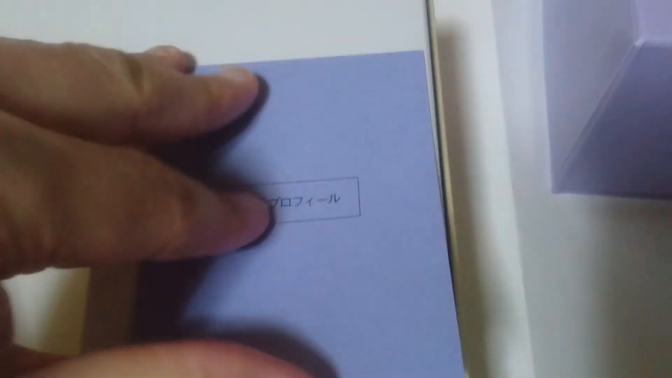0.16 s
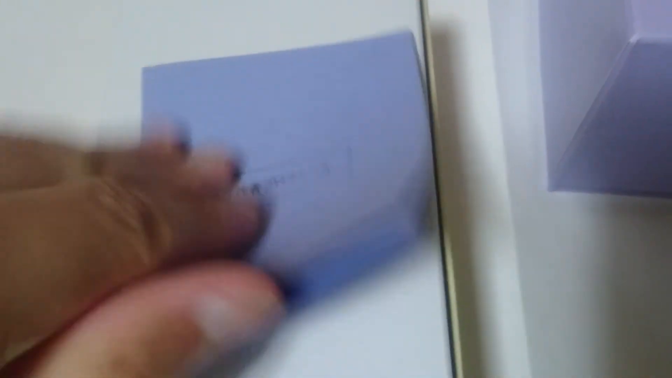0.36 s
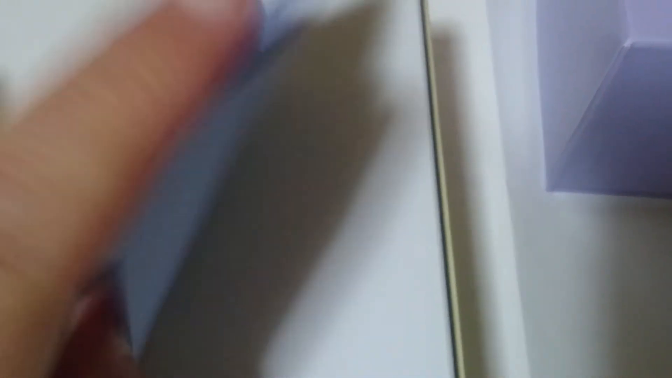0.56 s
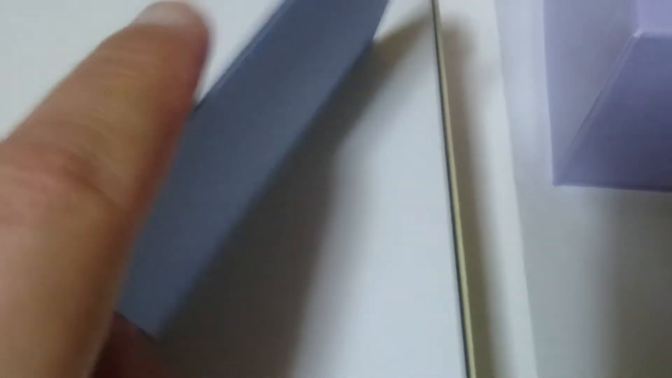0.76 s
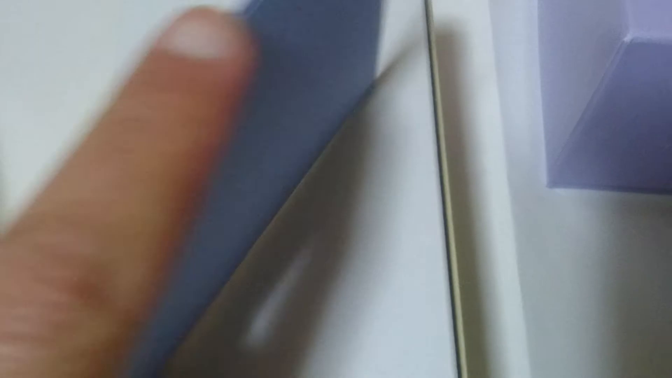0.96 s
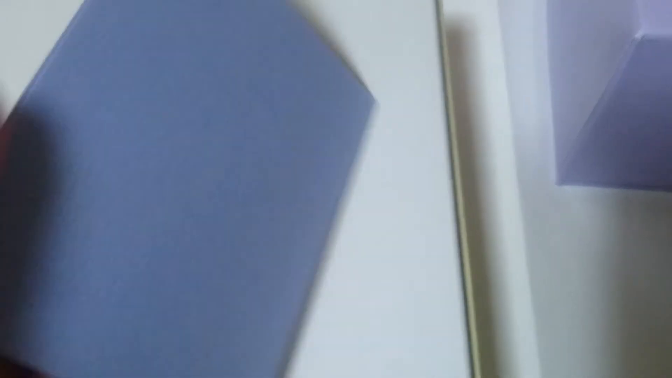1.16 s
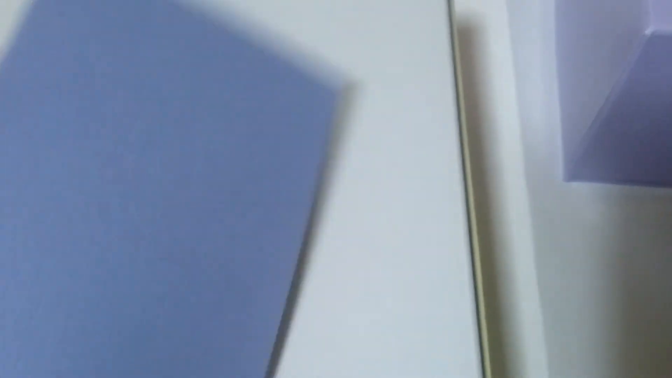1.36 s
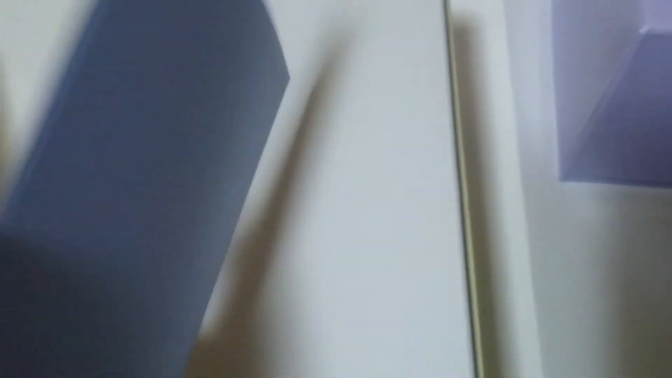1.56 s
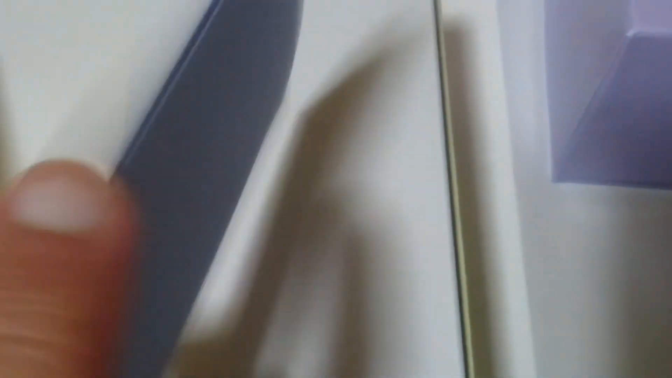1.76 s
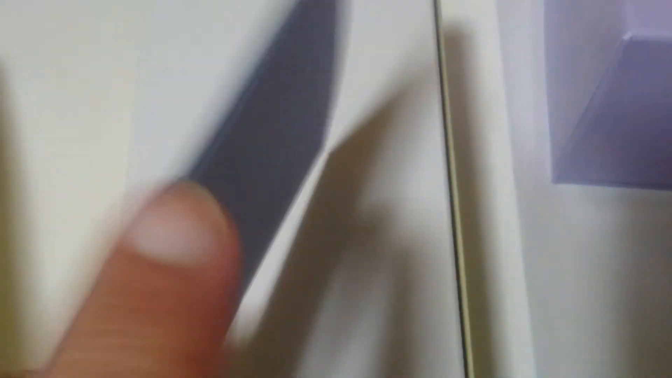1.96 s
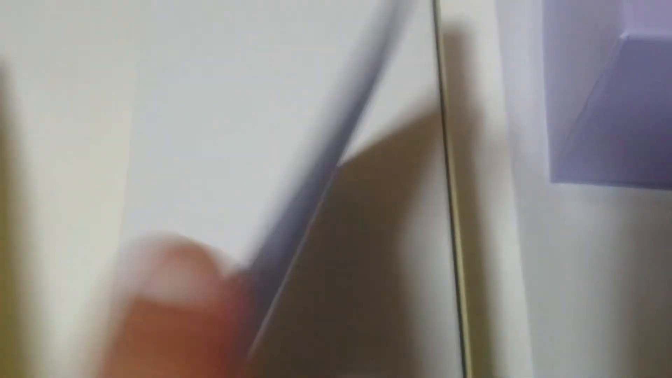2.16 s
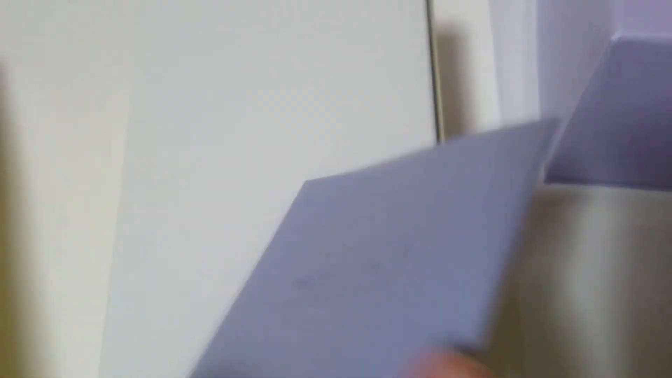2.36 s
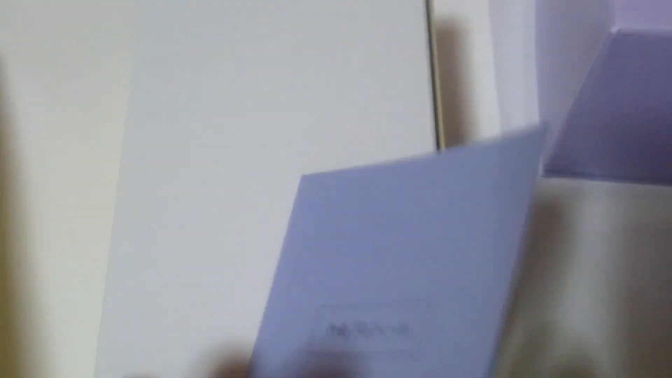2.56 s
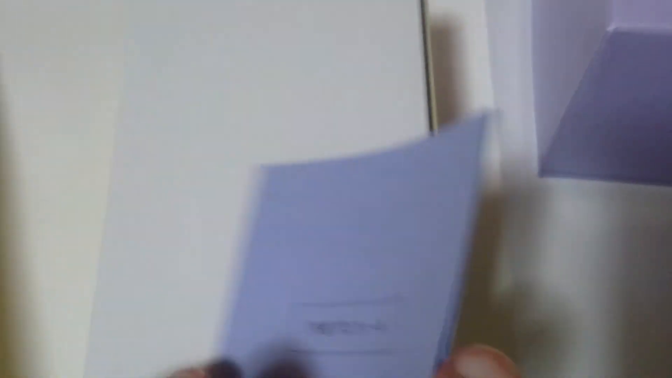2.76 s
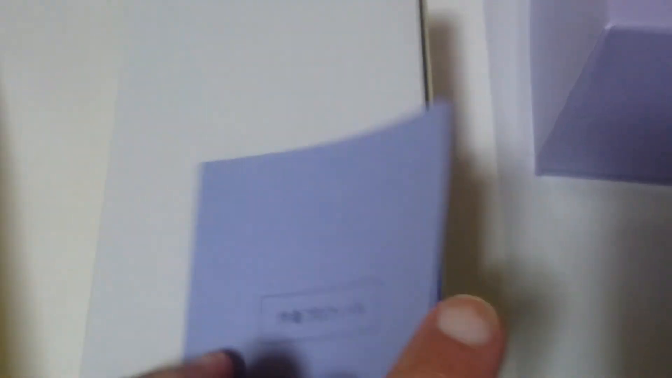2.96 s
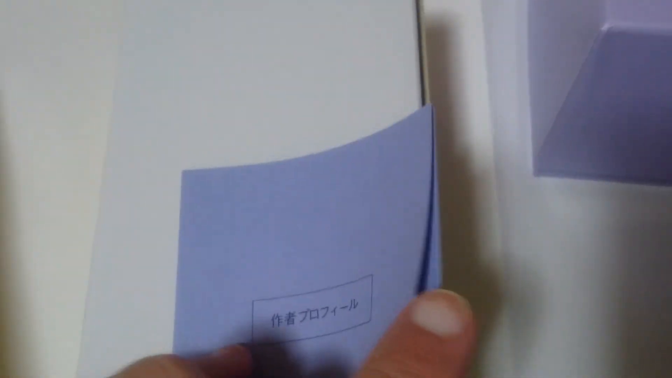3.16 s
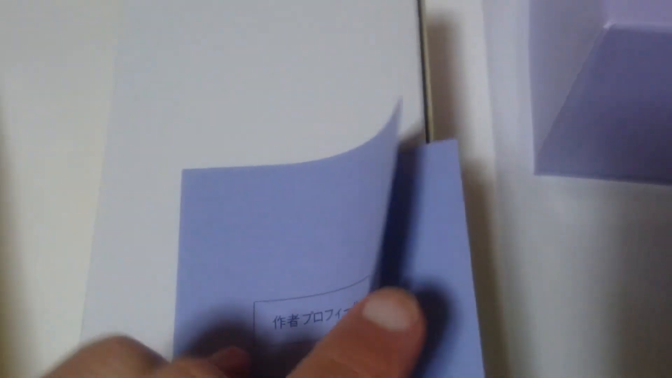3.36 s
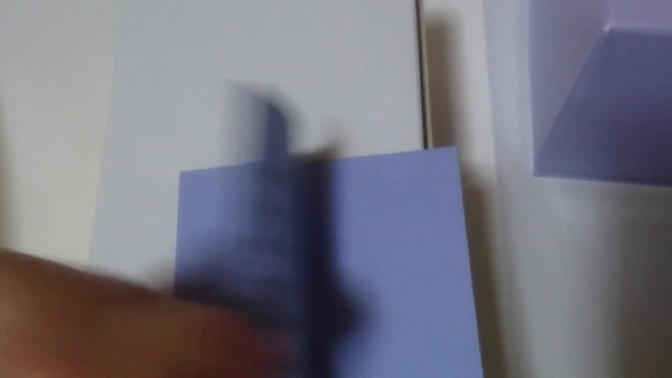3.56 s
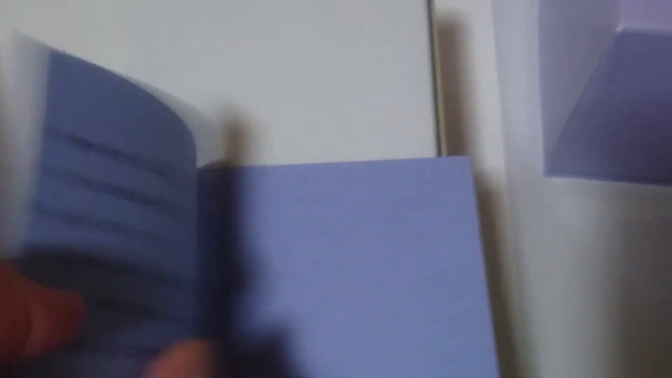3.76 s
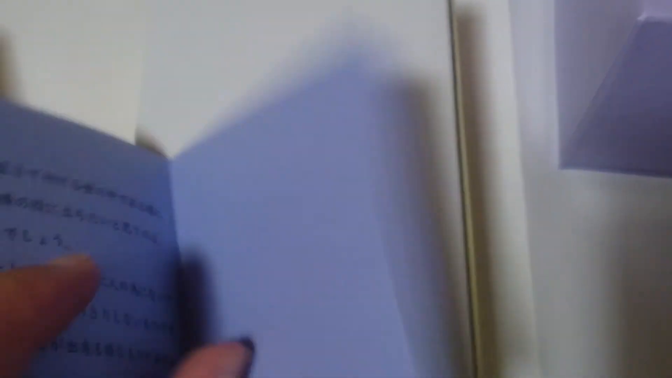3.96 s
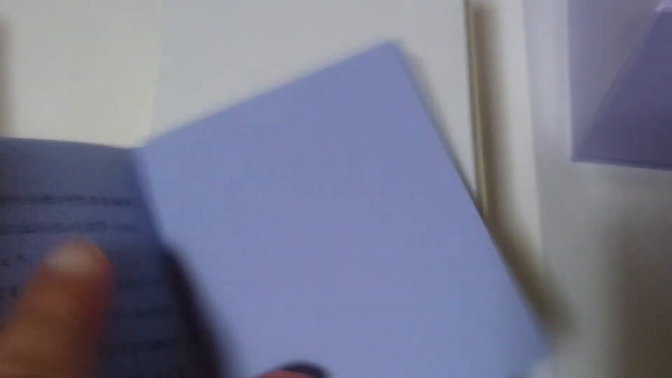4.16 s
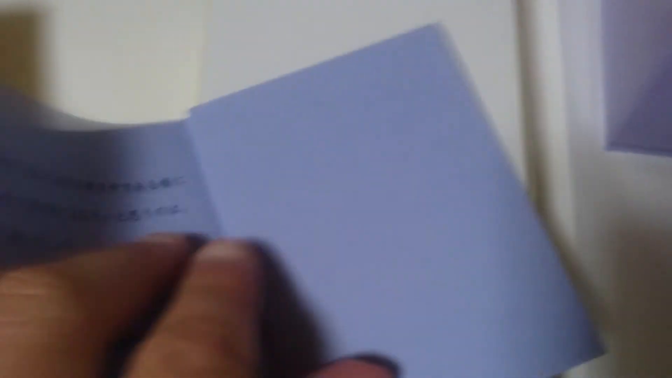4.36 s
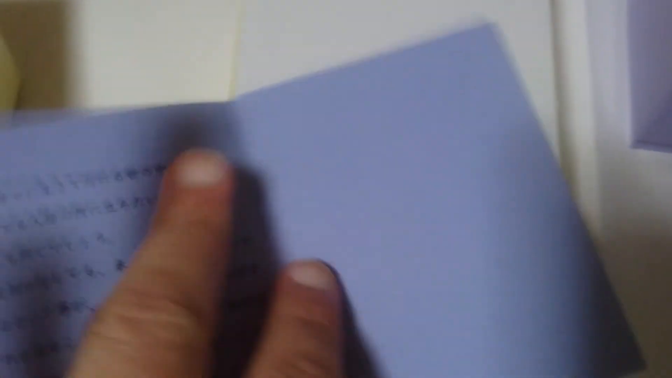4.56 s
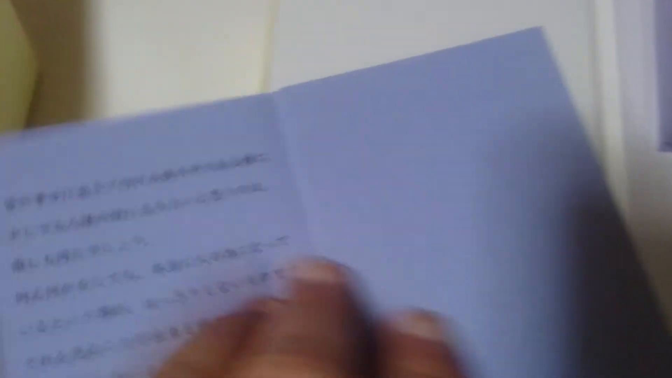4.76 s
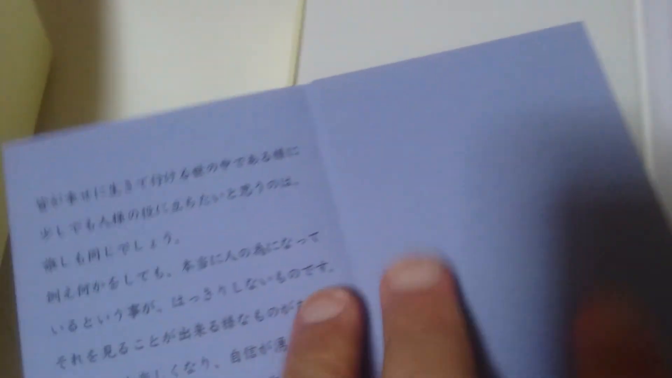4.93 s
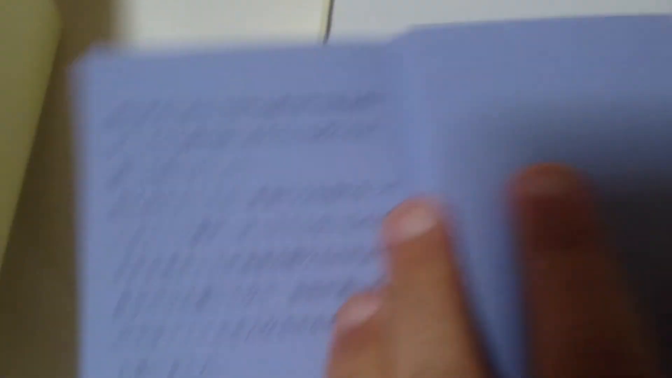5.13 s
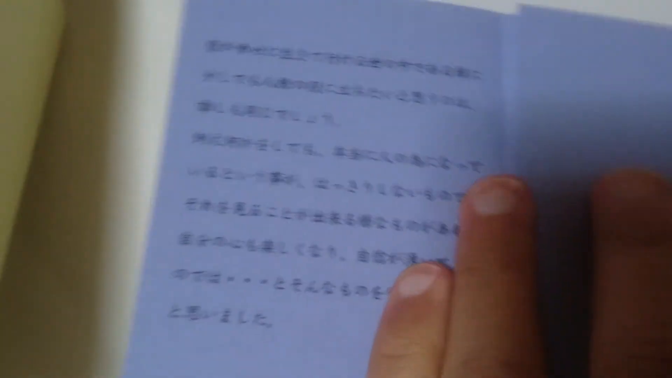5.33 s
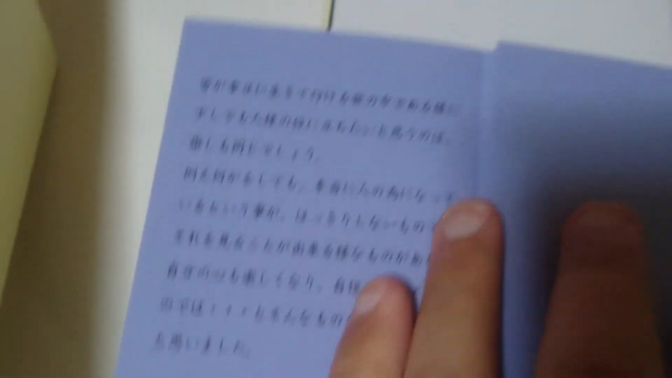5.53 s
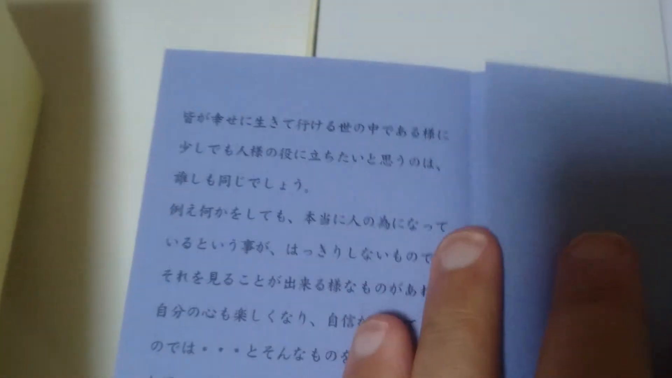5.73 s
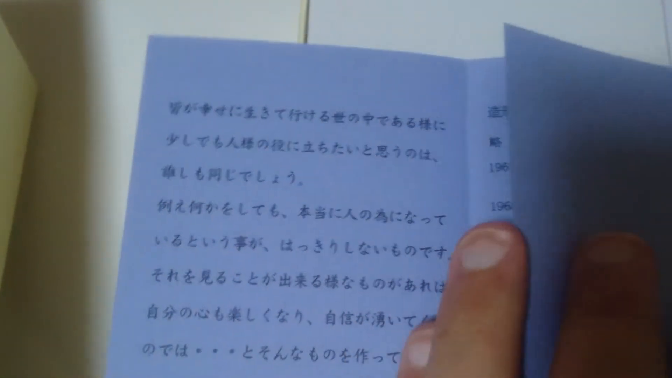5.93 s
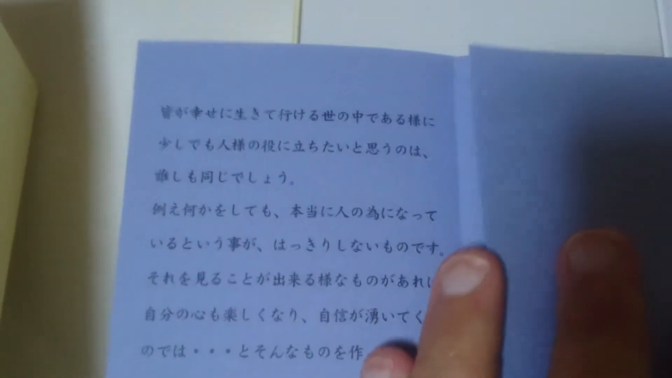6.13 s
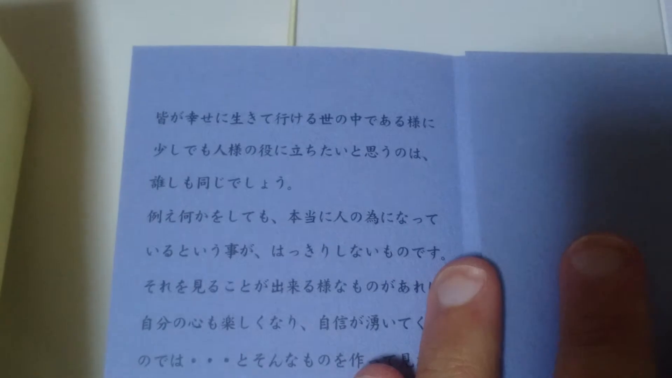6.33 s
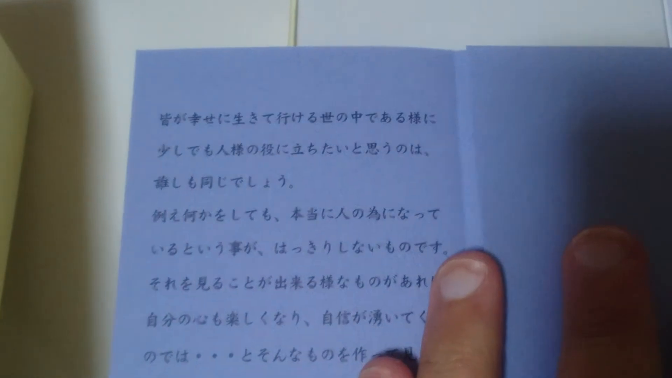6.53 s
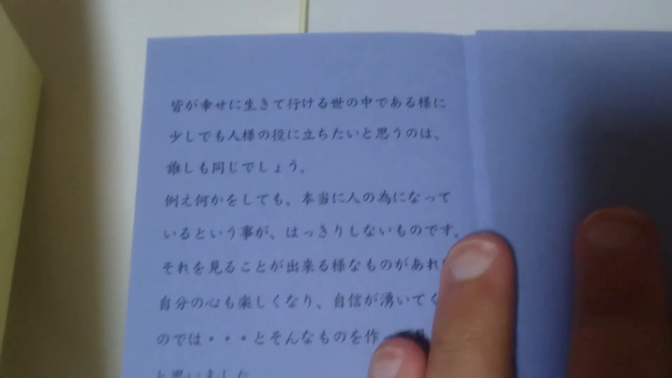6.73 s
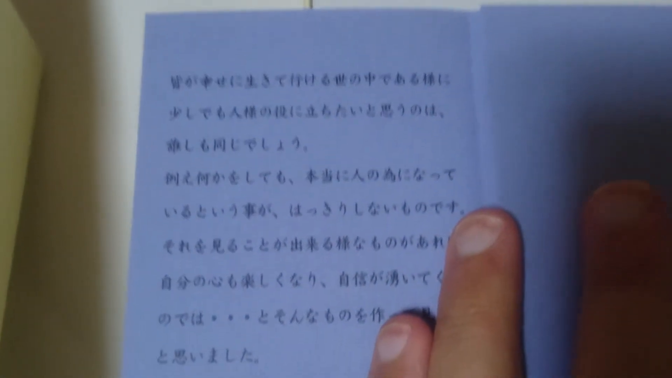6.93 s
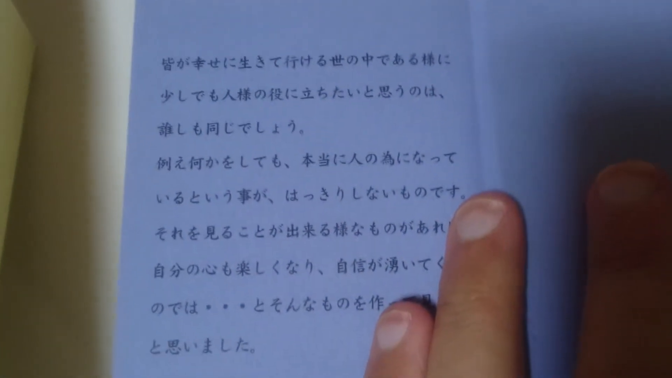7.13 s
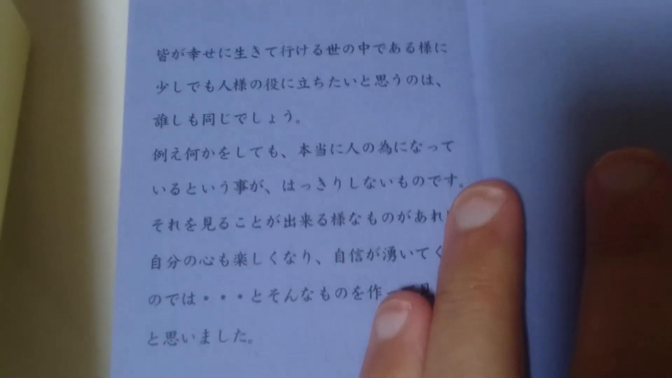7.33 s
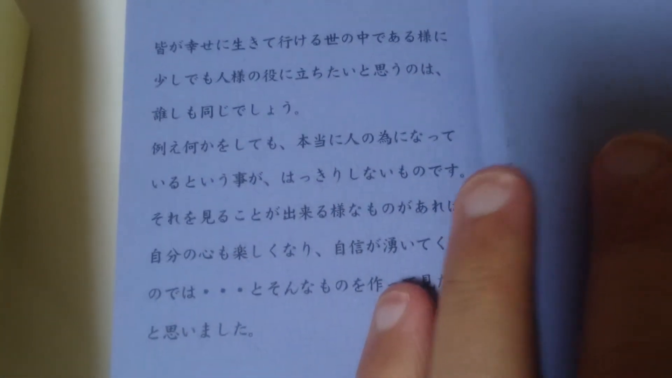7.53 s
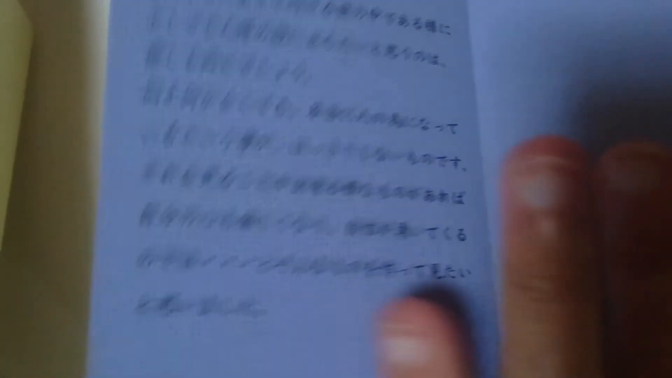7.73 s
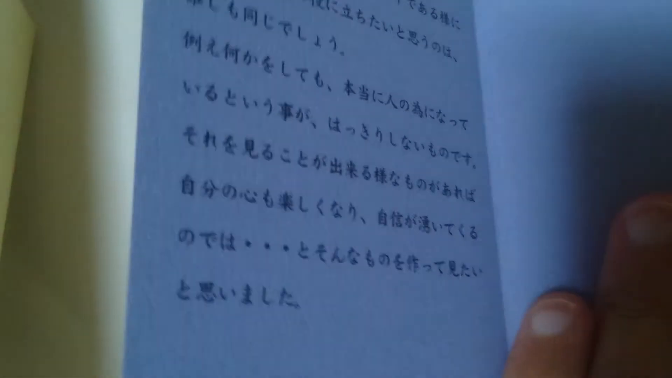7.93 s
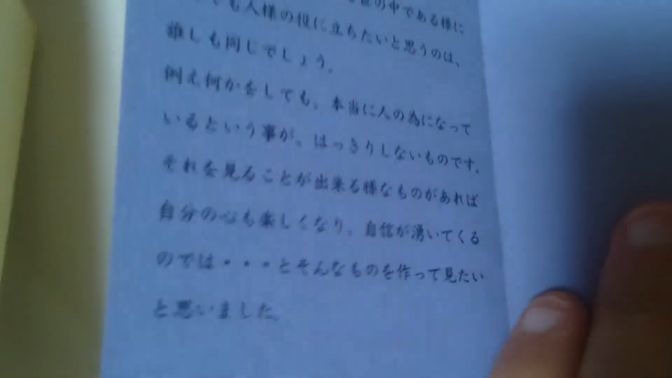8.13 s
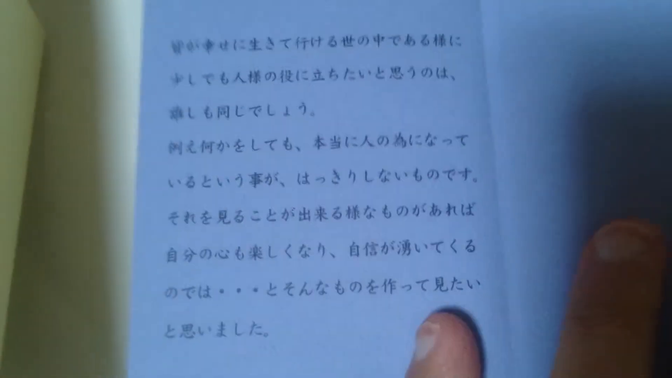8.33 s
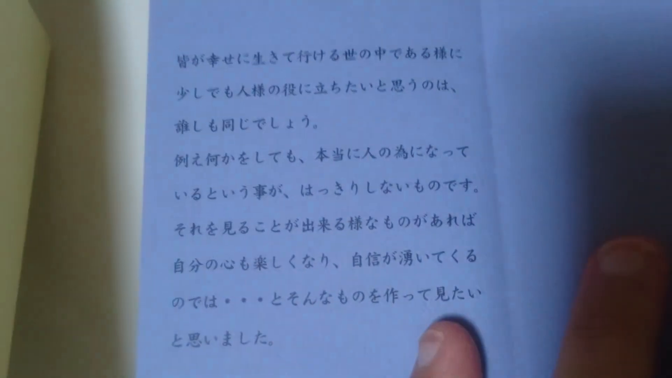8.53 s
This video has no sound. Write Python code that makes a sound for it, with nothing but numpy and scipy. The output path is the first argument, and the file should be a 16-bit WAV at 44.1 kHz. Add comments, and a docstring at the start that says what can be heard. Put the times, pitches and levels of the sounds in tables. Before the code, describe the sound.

Close, dry paper sounds in a small, quiet room. A booklet's cover brushes past the fingers and buckles crisply twice, followed by gentle sliding and scattered ticks. Midway the pages flap open with a cluster of snaps, and fingertips thump softly on the desk and rub along the fold. The rubbing fades almost to silence before a last brief rustle and a couple of clicks from a turning page.

```python
"""At a desk in a quiet room, a small paper booklet is handled close by.
The cover is lifted, the booklet is opened and pressed flat, and a page is turned. Sliding sheets
hiss and tick as their fibres catch, stiff paper buckles with snaps, and edges swish past the fingers.
Air rings between the rubbing sheets; fingertips thud softly and squeak once along the fold.
The desk ripples the colour of the rubbing, and a short room tail and faint room tone sit behind it."""
import sys
import numpy as np
from scipy import signal
from scipy.fft import rfft, irfft, next_fast_len
from scipy.io import wavfile
from scipy.ndimage import map_coordinates

SR = 44100
rng = np.random.default_rng(int(sys.argv[2]) if len(sys.argv) > 2 else 0)


def unload_wav(signal):
    """Save mono or channel-first audio to the path in sys.argv[1] as 16-bit WAV at rate SR, clipped to [-1, 1]."""
    wavfile.write(
        sys.argv[1],
        SR,
        np.round(np.clip(np.atleast_2d(signal).T, -1, 1) * 32767).astype(np.int16),
    )


N = 378819

# a hand slides paper over paper; swell is the change over the stroke, body and fizz are re the rustle:
# start_s, end_s, rustle_db, swell_db, body_db, fizz_db, centre_hz
STROKES = [(0, 0.241, -64, 4, -6.5, -20.5, 1500), (.25, 0.448, -56.5, 3.5, -10, -16.5, 3200),
           (0.479, 0.652, -53, 7.5, -9.5, -8, 2000), (.72, .94, -61, -9.5, -2.5, -22.5, 1600),
           (.96, 1.04, -67.5, 14.5, -1.5, -21, 2004), (1.05, 1.237, -60, 0.5, -3, -26.5, 1700),
           (1.27, 1.45, -64, 8, -6, -20.5, 2910), (1.505, 1.645, -67, -3, -1, -18, 2009),
           (1.66, 1.848, -66.5, 1, -9, -29, 1400), (1.86, 2.18, -76.5, -4.5, -6.5, -30, 1400),
           (2.288, 2.54, -65.5, -1.5, 0, -21.5, 1700), (2.542, 2.861, -56, 2, -5.5, -22, 1500),
           (2.884, 3.222, -67, 0, -5.5, -18, 2100), (3.26, 3.335, -66, 3, -7, -20, 1800),
           (3.345, 3.62, -61, -7, -10.5, -24, 1900), (3.63, 3.846, -50.5, 10, -18, -24.5, 2300),
           (3.863, 3.953, -52.5, 7, -4.5, -17, 1816), (3.97, 4.26, -52.5, 3.5, -7, -15.5, 2200),
           (4.27, 4.454, -52.5, 10.5, -8, -23, 1400), (4.473, 4.604, -44, -2.5, -10.5, -18, 1600),
           (4.632, 4.743, -60, -2, 4, -8, 1900), (4.745, 4.929, -53, 0, -2.5, -5.5, 1950),
           (4.934, 5.116, -59, 6.5, -8, -12, 2700), (5.121, 5.248, -45, -1, -12.5, -12, 3210),
           (5.258, 5.332, -54, -6.5, -10, -20.5, 3385), (5.359, 5.468, -55, -0.5, -8, -26, 3200),
           (5.478, 5.856, -63.5, -7.5, -4.5, -32.5, 1500), (5.846, 5.932, -59, 2.5, -9.5, -19.5, 3000),
           (5.93, 6.137, -64.5, 2.5, -8, -23.5, 2600), (6.14, 6.353, -71.5, 1, -5, -19.5, 2367),
           (6.36, 7.664, -87, 0, -5.5, -6.5, 4486), (7.674, 7.814, -67.5, -2.5, -2, -24, 1500),
           (7.809, 7.914, -58.5, 6, -8.5, -9, 2400), (7.938, 8.022, -66.5, -7.5, 0.5, -24, 1500),
           (8.06, 8.122, -62.5, 0.5, 0.5, -16, 1500), (8.16, 8.367, -70, 3.5, 1.5, -20, 1500),
           (8.38, 8.52, -77, -8.5, -1.5, -19, 1498)]
# a sheet buckles suddenly: start_s, level_db (over 10 ms), pitch_hz, high_edge_hz, pop_share (0-1)
SNAPS = [(.589, -44, 1400, 6400, .3), (.661, -42.5, 380, 1900, 0.46), (0.7059, -22, 510, 2170, 0.92),
         (1.0022, -30.5, 446, 1110, 0.86), (2.2466, -42.5, 337, 480, 0.9), (2.4182, -39.5, 480, 1750, .06),
         (2.5215, -43.5, 270, 3470, 0), (2.572, -49, 300, 1490, 0), (3.313, -57.5, 1200, 5550, 0.4),
         (3.360, -51, 1400, 6700, .3), (3.368, -48, 1200, 6700, 0), (3.405, -44.5, 1200, 8050, .3),
         (3.907, -46, 600, 1888, 0.02), (4.034, -43, 260, 2880, 0.46), (4.2432, -23, 1150, 2080, 0.38),
         (4.248, -27, 800, 1400, .2), (4.416, -27.5, 330, 2390, .5), (4.6064, -26, 1300, 2240, .1),
         (4.612, -25, 1016, 1400, 0.13), (4.749, -44, 935, 2750, 0.72), (4.772, -53, 950, 2800, 0.6),
         (4.809, -41.5, 620, 800, 0.2), (4.8291, -44, 500, 5000, .9), (4.854, -34, 676, 2100, 0.43),
         (5.0523, -42, 800, 6500, 0.56), (8.004, -61, 1000, 2600, .2), (8.0573, -34.5, 1000, 1560, 0.15),
         (8.3078, -36.5, 1900, 3040, 1)]
# a page flaps over or is flattened: peak_s, level_db (over 10 ms), pitch_hz, high_edge_hz, length_s
FLAPS = [(.73, -43.5, 500, 2200, 0.27), (.771, -39, 630, 1910, 0.023), (2.434, -40.5, 250, 1550, 0.022),
         (3.385, -47, 950, 6700, 0.068), (3.824, -40, 240, 2750, 0.1), (4.357, -45, 1300, 2650, .08),
         (4.412, -27.5, 1120, 3430, 0.055), (4.602, -33, 1270, 2230, 0.021), (4.632, -33, 850, 1200, 0.11),
         (4.842, -30.5, 1000, 1400, 0.056), (4.866, -31.5, 635, 965, 0.07),
         (5.065, -45.5, 270, 1800, 0.085), (7.701, -40.5, 375, 1100, 0.043), (8.309, -46, 332, 1497, 0.039)]
# resonances of the held sheet: centre_hz, width_hz, boost_db
SHEET_MODES = [(326, 290, 5.5), (550, 120, 4), (1400, 220, 4.5), (2440, 600, 3.5), (7300, 1600, 2.5)]
# an edge brushes a finger or another sheet: peak_s, level_db, length_s, tilt_db_per_octave
SWISHES = [(.41, -51, 0.24, 2), (.645, -30.5, 0.048, 1.5), (.754, -51, .046, -2), (.848, -53, .054, -1),
           (1.11, -59, 0.15, -1.5), (1.397, -45.5, .035, -2), (1.446, -57, .025, -6),
           (1.824, -52.5, .041, -4.5), (1.949, -55, 0.045, 0.5), (2.004, -50.5, .032, .5),
           (2.207, -61.5, .026, -4), (2.423, -42.5, .013, -4.5), (2.578, -45.5, .023, -3.5),
           (2.826, -55, .08, -1), (2.957, -56, .047, -3), (3.16, -65, 0.12, -2), (3.414, -45.5, 0.064, -1),
           (3.438, -43.5, 0.022, -1.5), (3.62, -58.5, 0.14, -0.5), (3.735, -53.5, .04, 0),
           (3.828, -46, 0.074, 1), (4.051, -50, .04, -4), (4.235, -45.5, .04, -4), (4.415, -32.5, .028, -3),
           (4.596, -39.5, .027, -2), (5.90, -67, .09, -1.5), (6.105, -62.5, 0.15, -3),
           (6.245, -65, 0.075, -3.5), (7.694, -44.5, 0.034, -4.5), (7.85, -57.5, .09, 12),
           (8.097, -56.5, .07, -8.5), (8.12, -56, .023, -0.5), (8.293, -49, .078, 3.5)]
# fingertips press the booklet on the desk: start_s, level_db
PRESSES = [(0.646, -46.5), (2.421, -47), (2.996, -50.5), (3.173, -54), (4.119, -46), (4.24, -33),
           (4.41, -29.5), (4.601, -35), (4.841, -30.5), (4.905, -43.5), (5.052, -45), (5.768, -48.5),
           (5.864, -49), (5.901, -51), (6.308, -53.5)]
# the air wedge between rubbing sheets rings: start_s, end_s, first_hz, last_hz, level_db
RASPS = [(0, 0.359, 470, 500, -70), (.05, 0.401, 1450, 1546, -71), (1.04, 1.262, 2900, 3400, -66.5),
         (1.66, 1.827, 1250, 1200, -67), (2.2, 2.6, 6700, 7300, -78.5), (3.44, 3.598, 2090, 1820, -63.5),
         (3.61, 3.668, 2180, 2204, -53), (3.7, 3.851, 2000, 1647, -52), (3.67, 3.802, 3400, 3000, -53.5),
         (4.99, 5.03, 4200, 3170, -60), (5.111, 5.219, 2670, 3350, -44.5), (5.19, 5.33, 3410, 3600, -56.5),
         (7.82, 7.928, 578, 717, -60.5)]
# a fingertip runs along the fold: time_s, pitch_hz
SQUEAK_PITCH = [(5.44, 10800), (5.51, 11950), (5.6, 12000), (5.65, 11100), (5.71, 11000), (5.77, 10200)]
# tone colours of the noise layers: frequency_hz, level_db
RUSTLE_EQ = [(400, -41), (850, -7.5), (1400, -2), (1900, -3), (2400, -3.5), (3300, -5), (4500, -3.5),
             (5400, -9.5), (7000, -22), (11000, -56.5)]  # midrange of sliding paper
BODY_EQ = [(40, -37.5), (100, -11.5), (240, -5), (380, -2.5), (520, -1), (800, -5), (1200, -5.5),
           (2500, -59.5)]  # its hollow low end
SHEEN_EQ = [(3500, -31), (5600, -12.5), (6500, -2), (7300, -1), (8300, -7.5), (9500, -14), (12000, -39)]  # its silky treble
FIZZ_EQ = [(5000, -38), (8500, -5), (10000, -3), (12000, -6), (14500, -0.5), (16000, -2)]  # its very top
EDGE_EQ = [(100, -17.5), (350, -16), (550, -2), (850, -9.5), (1800, -3), (4000, 2), (5500, -5.5),
           (7400, 2.5), (10500, -12), (15000, -10)]  # a swishing edge
ROOM_TONE_EQ = [(20, -33.5), (32, -21.5), (45, -6), (58, -0.5), (80, -5.5), (110, -20), (200, -17),
                (400, -18), (1000, -19.5), (3000, -26), (4700, -31), (5600, -34.5), (15800, -37.5)]  # the quiet room
# decay of the small room: frequency_hz, t60_s
ROOM_DECAY = [(150, 0.54), (1000, 0.1), (4000, .22), (14000, 0.1)]

STROKE_ATTACK_S, STROKE_RELEASE_S = 0.0127, 0.014  # the hand gets going, and comes to rest
SNAP_RISE_S, SNAP_FALL_S = 0.00048, 0.02  # each spans 40 dB; the fall is for a 500 Hz patch
FLAP_RISE_SHARE, SWISH_RISE_SHARE = 0.43, 0.61  # of the length
FLAP_POP_SHARE = 0.11  # of the energy
TOP_HZ = 15900


def strokes():
    """Each hand stroke starts, swells or fades, and stops: rustle, body and fizz gains, and centre Hz."""
    t = np.arange(0, N, 64) / SR
    start, end, db, swell_db, body_db, fizz_db, hz = np.transpose(STROKES)[:, :, None]
    attack = (1 + np.tanh((t - start) / STROKE_ATTACK_S)) / 2
    release = (1 + np.tanh((end - t) / STROKE_RELEASE_S)) / 2
    from_middle = np.clip((t - (start + end) / 2) / (end - start), -0.5, 0.5)
    power = attack * release * amp(db + swell_db * from_middle) ** 2 + 1e-20
    gains = [np.sqrt((power * amp(part_db) ** 2).sum(0)) for part_db in (0, body_db, fizz_db)]
    centre = (power * hz).sum(0) / power.sum(0)
    return [np.interp(np.arange(N) / SR, t, control) for control in gains + [centre]]


def fibres(ticks_per_s, spread_db, catch_db):
    """Paper friction: a hiss of countless fibres, some catching and letting go as tiny ticks."""
    size = amp(spread_db * np.minimum(rng.standard_normal(N), 1))
    ticks = (rng.random(N) < ticks_per_s / SR) * rng.choice([-1, 1], N) * size
    return unit(rng.standard_normal(N) + amp(catch_db) * unit(ticks))


def sliding(rustle_trim_db=-1, fizz_trim_db=2.5, grip_db=1.45):
    """Sheets rub; the gap between them favours a band that sweeps as they lift and close."""
    rustle, body, fizz, centre_hz = strokes()
    sheen = np.sqrt(rustle * fizz)
    friction = fibres(ticks_per_s=780, spread_db=3, catch_db=-7)
    swept = sweep_band(coloured(friction, RUSTLE_EQ), centre_hz, width_octaves=1, boost_db=11)
    sound = rustle * amp(rustle_trim_db) * swept
    sound += body * coloured(fibres(ticks_per_s=160, spread_db=7, catch_db=-9), BODY_EQ)
    sound += sheen * coloured(fibres(ticks_per_s=600, spread_db=5, catch_db=-5), SHEEN_EQ)
    sound += fizz * amp(fizz_trim_db) * coloured(friction, FIZZ_EQ)
    uneven_grip = amp(grip_db * (wobble(28) + wobble(130)))
    return sound * uneven_grip


def buckle_cues():
    """Snaps hit at once, small high patches dying sooner; flaps swell and fade."""
    for s, db, pitch_hz, high_hz, pop_share in SNAPS:
        fall_s = SNAP_FALL_S * (500 / pitch_hz) ** 0.4
        yield s, db, pitch_hz, high_hz, SNAP_RISE_S, fall_s, pop_share
    for s, db, pitch_hz, high_hz, length_s in FLAPS:
        rise_s, fall_s = FLAP_RISE_SHARE * length_s, (1 - FLAP_RISE_SHARE) * length_s
        yield s, db, pitch_hz, high_hz, rise_s, fall_s, FLAP_POP_SHARE


def buckles(leak_db=-23, ring_db=3, delay_at_1khz_s=0.0005, bounce=0.22, rim_hz=5000):
    """Paper buckles: a clean pop in a burst of crumpling, its band and ring set by the patch's size."""
    out = np.zeros(N)
    size = 16384
    t = (np.arange(size) - size // 8) / SR
    hz = np.fft.rfftfreq(size, 1 / SR) + 1
    sheet = np.prod([bell_eq(hz, *mode) for mode in SHEET_MODES], axis=0)
    # bending waves: lows cross the sheet more slowly
    bending = np.exp(-4j * np.pi * delay_at_1khz_s * np.sqrt(1000 * hz))
    for s, db, pitch_hz, high_hz, rise_s, fall_s, pop_share in buckle_cues():
        low_hz = 0.64 * pitch_hz  # a patch radiates little below its note
        low_cut = 1 / np.hypot(1, (low_hz / hz) ** 3.3) + amp(leak_db) * hz / (hz + 50)
        soft_hz = max(2.2 * high_hz, 5000)  # paper is soft: the treble falls faster above this
        high_cut = 1 / np.hypot(1, (hz / high_hz) ** 2.35) / np.hypot(1, (hz / soft_hz) ** 2)
        ring = bell_eq(hz, pitch_hz, 0.14 * pitch_hz, ring_db)
        # the wave runs between the held and the free edge, ringing on odd harmonics
        round_trip = bounce * np.exp(-1j * np.pi * hz / pitch_hz) / (1 + 1j * hz / rim_hz)
        response = minimum_phase(sheet * ring * low_cut * high_cut) / (1 + round_trip)
        burst = rng.standard_normal(size) * amp(-40 * np.abs(t) / np.where(t < 0, rise_s, fall_s))
        crumple = unit(irfft(rfft(burst) * response))
        pop = unit(irfft(rfft(-1.0 * (t == 0)) * response * bending))
        buckle = np.sqrt(pop_share) * pop + np.sqrt(1 - pop_share) * crumple
        add(out, s + t[0], amp(db) * buckle / np.linalg.norm(buckle) * np.sqrt(SR / 100))
    return out


def swishes(roundness=1.6, ripple_db=3.5, mirror_s=0.000709):
    """An edge speeds up along the paper and slips off: a bright swell that ends quickly."""
    out = np.zeros(N)
    t = np.arange(-SR // 5, SR // 5) / SR
    friction = fibres(ticks_per_s=720, spread_db=6, catch_db=-0.5)
    for s, db, length_s, tilt_db in SWISHES:
        delay_s = mirror_s * np.exp(0.27 * rng.standard_normal())

        def colour(hz):
            """The edge's tone, tilted, and rippled by its reflection off the facing page."""
            tilt = tilt_db * np.log2((hz + 500) / 4000)
            ripple = ripple_db * np.cos(2 * np.pi * hz * delay_s)
            return amp(along(EDGE_EQ, hz) + tilt + ripple)

        rub = friction[round(s * SR) - len(t) // 2:][:len(t)]
        ramp_s = length_s * np.where(t < 0, SWISH_RISE_SHARE, 1 - SWISH_RISE_SHARE)
        swell = amp(db - 20 * np.abs(t / ramp_s) ** roundness)
        add(out, s + t[0], unit(filtered(rub, colour)) * swell)
    return out


def presses(trim_db=-1, centre_hz=106, sag=0.36, attack_s=0.003, settle_s=0.01, t60_s=0.08):
    """A soft fingertip lands with a dull thud whose pitch sinks as it settles."""
    out = np.zeros(N)
    t = np.arange(SR // 4) / SR
    pitch_hz = centre_hz * (1 + sag * (2 * np.exp(-t / settle_s) - 1))
    thud = np.sin(2 * np.pi * np.cumsum(pitch_hz) / SR) * (1 - np.exp(-t / attack_s))
    for s, db in PRESSES:
        add(out, s, amp(db + trim_db - 60 * t / t60_s) * thud)
    return out


def rasps(width_share=0.12, fade_share=0.28):
    """Friction rings a narrow air wedge, whose pitch glides as the sheets part or close."""
    out = np.zeros(N)
    for start, end, first_hz, last_hz, db in RASPS:
        n = round((end - start) * SR)
        b, a = signal.butter(2, width_share * first_hz, fs=SR)
        flutter = signal.lfilter(b, a, rng.standard_normal((2, SR)))[:, -n:]
        phase = 2 * np.pi * np.cumsum(np.linspace(first_hz, last_hz, n)) / SR
        ring = unit(flutter[0] * np.cos(phase) + flutter[1] * np.sin(phase))
        add(out, start, amp(db) * ring * signal.windows.tukey(n, fade_share))
    return out


def squeak(level_db=-89, waver=0.006):
    """Skin sticks and slips along the fold: a faint, thin whistle that arches and sinks."""
    out = np.zeros(N)
    s, hz = np.transpose(SQUEAK_PITCH)
    t = np.arange(s[0], s[-1], 1 / SR)
    pitch_hz = np.interp(t, s, hz) * (1 + waver * wobble(400)[:len(t)])
    whistle = unit(np.sin(2 * np.pi * np.cumsum(pitch_hz) / SR))
    add(out, s[0], amp(level_db) * whistle * signal.windows.tukey(len(t)))
    return out


def desk_reflections(x, delay_s=0.0013, drift=0.12, echo_gain=0.18, count=3):
    """Desk, hand and pages mirror the rubbing; the paths shift with the booklet and comb its tone."""
    now = np.arange(N)
    delays = [SR * delay_s * k * np.exp(drift * wobble(1.5)) for k in range(1, count + 1)]
    echoes = sum(np.interp(now - delay, now, x) for delay in delays)
    return (x + echo_gain * echoes) / np.sqrt(1 + count * echo_gain ** 2)


def room_reverb(x):
    """The small room answers briefly after 5 ms, the lows lingering longest."""
    hz, t, noise = signal.stft(rng.standard_normal(SR // 2), SR, nperseg=256)
    decay = amp(-60 * t / along(ROOM_DECAY, hz)[:, None])
    tail = signal.istft(noise * decay, SR, nperseg=256)[1]
    return signal.fftconvolve(x, np.pad(tail / np.linalg.norm(tail), (SR // 200, 0)))[:N]


def room_tone(level_db=-71.5):
    """A faint bed of room noise with a low rumble."""
    return amp(level_db) * coloured(rng.standard_normal(N), ROOM_TONE_EQ)


def amp(db):
    """Decibels to gain."""
    return 10 ** (np.asarray(db) / 20)


def unit(x):
    """x at rms 1."""
    return x / np.sqrt(np.mean(x ** 2) + 1e-20)


def along(points, hz):
    """A curve of (Hz, value) points, read on a log frequency axis."""
    point_hz, values = np.transpose(points)
    return np.interp(np.log(hz + 1), np.log(point_hz + 1), values)


def wobble(knots_per_s):
    """A smooth random modulator."""
    knots = rng.standard_normal(int(N * knots_per_s / SR) + 4)
    return map_coordinates(knots, [np.arange(N) * knots_per_s / SR])


def filtered(x, response):
    """x through a filter given as gain against Hz."""
    size = next_fast_len(len(x) + 8192)
    return irfft(rfft(x, size) * response(np.fft.rfftfreq(size, 1 / SR)), size)[:len(x)]


def coloured(x, eq):
    """x through an EQ curve, at rms 1."""
    return unit(filtered(x, lambda hz: amp(along(eq, hz))))


def bell_eq(hz, centre_hz, width_hz, boost_db):
    """The gain curve of one resonance."""
    return amp(boost_db / (1 + (2 * (hz - centre_hz) / width_hz) ** 2))


def sweep_band(x, centre_hz, width_octaves, boost_db):
    """Boost a band whose centre follows a curve; the result is at rms 1."""
    hz, t, spectrum = signal.stft(x, SR, nperseg=512)
    octaves = np.log2((hz[:, None] + 1) / np.interp(t, np.arange(len(x)) / SR, centre_hz))
    boost = amp(boost_db / (1 + (octaves / width_octaves) ** 2))
    return unit(signal.istft(spectrum * boost, SR, nperseg=512)[1][:len(x)])


def minimum_phase(gain):
    """The response with this gain that rings only after the hit."""
    cepstrum = irfft(np.log(np.maximum(gain, 1e-6)))
    half = len(cepstrum) // 2
    cepstrum[1:half] *= 2
    cepstrum[half + 1:] = 0
    return np.exp(rfft(cepstrum))


def add(track, s, sound):
    """Mix a sound into the track from time s."""
    start = max(round(s * SR), 0)
    track[start:start + len(sound)] += sound[:max(len(track) - start, 0)]


def scene(reverb_db=-18):
    """Close paper over a quiet room, the same in both channels."""
    rubbing = desk_reflections(sliding() + swishes())
    paper = rubbing + rasps() + squeak() + buckles() + presses()
    mono = paper + amp(reverb_db) * room_reverb(paper) + room_tone()
    return np.array([mono, mono])


def record(dry):
    """A brick-wall high cut at TOP_HZ."""
    return np.array([filtered(channel, lambda hz: hz < TOP_HZ) for channel in dry])


dry = scene()
out = record(dry)
unload_wav(out)
```